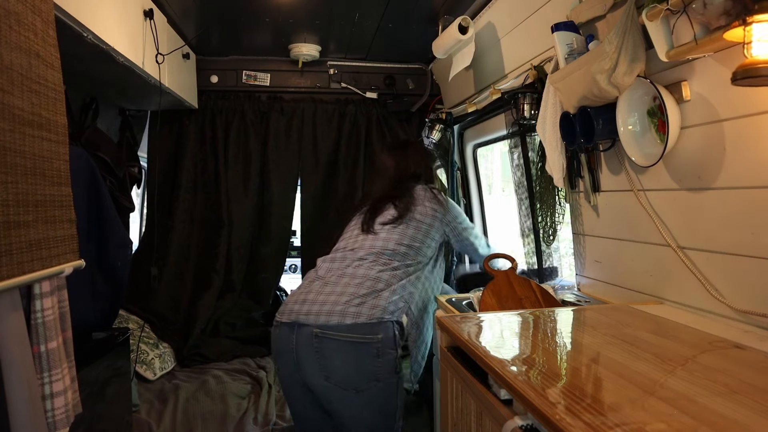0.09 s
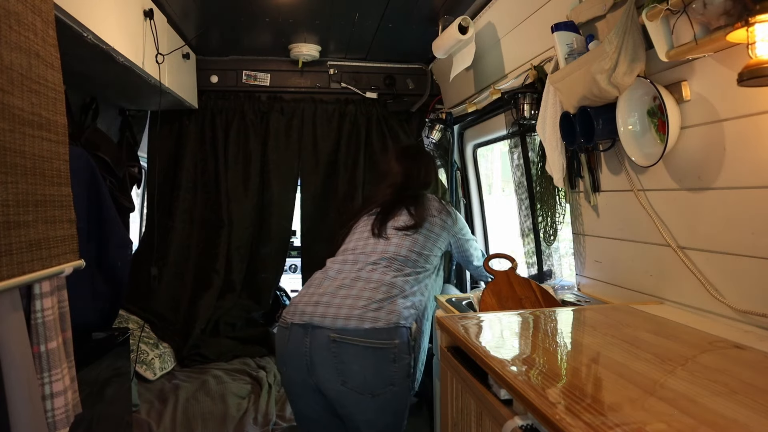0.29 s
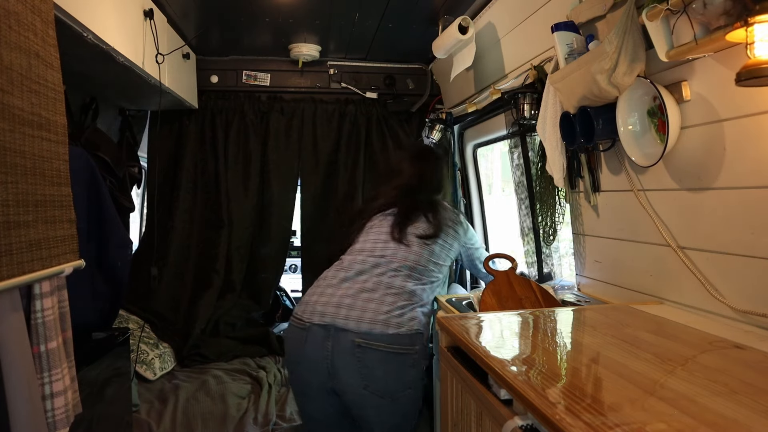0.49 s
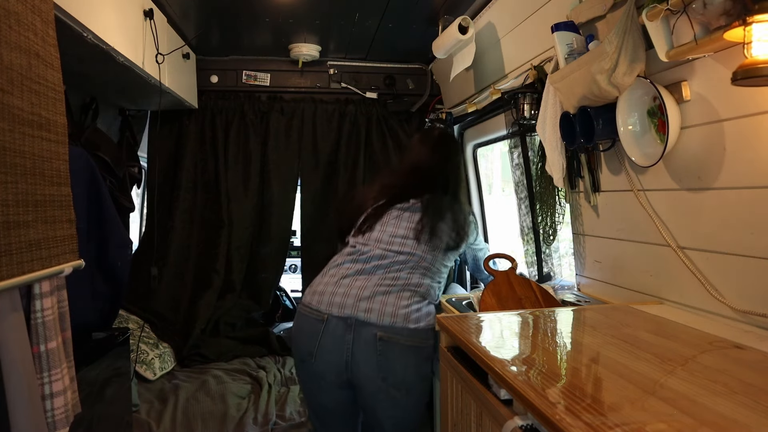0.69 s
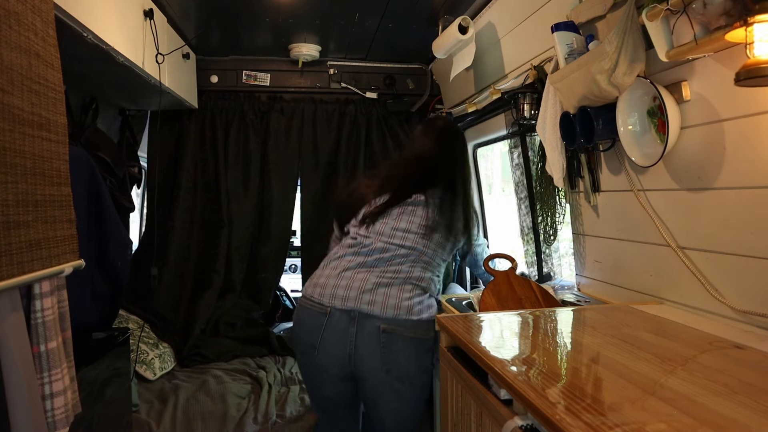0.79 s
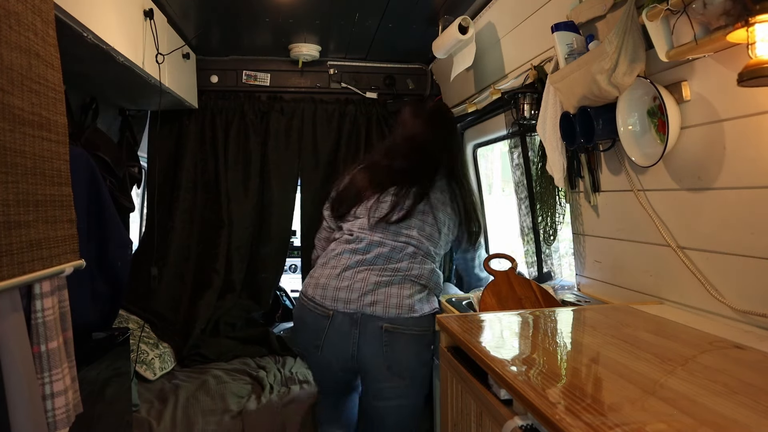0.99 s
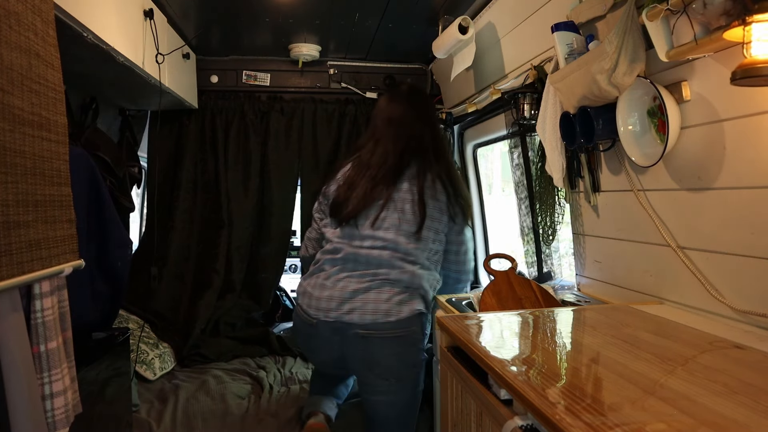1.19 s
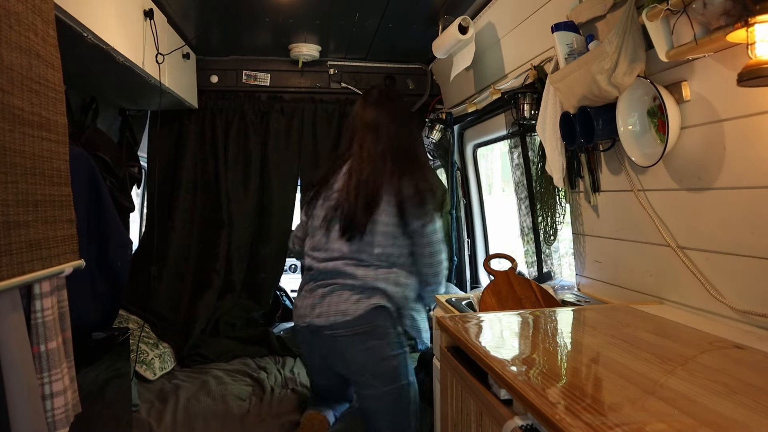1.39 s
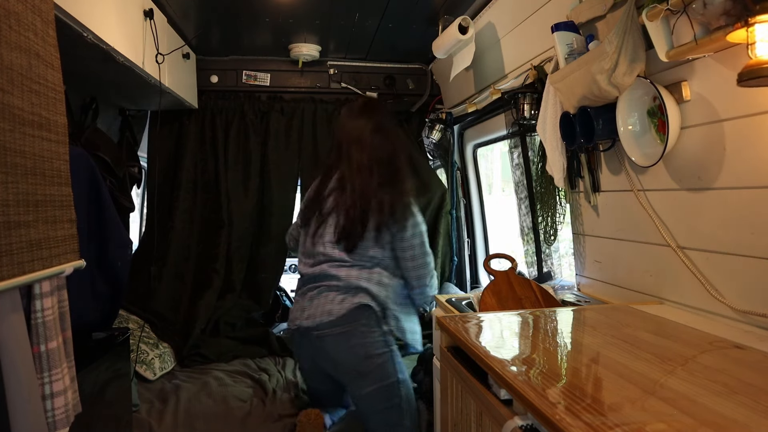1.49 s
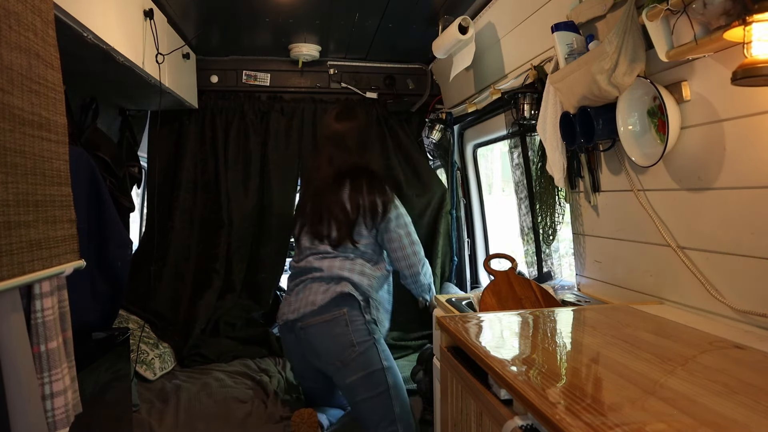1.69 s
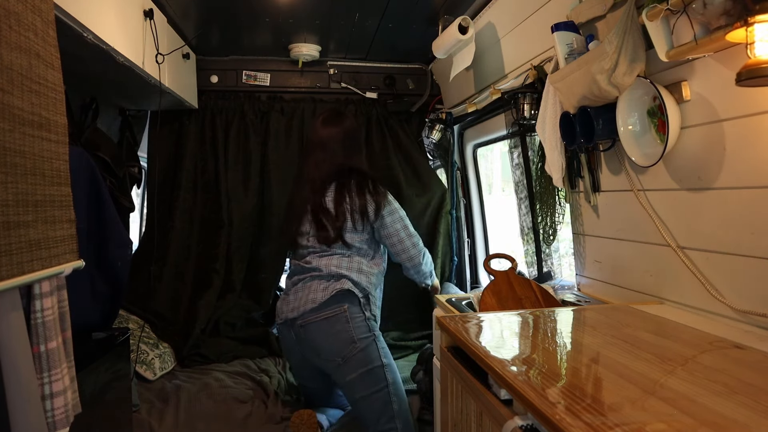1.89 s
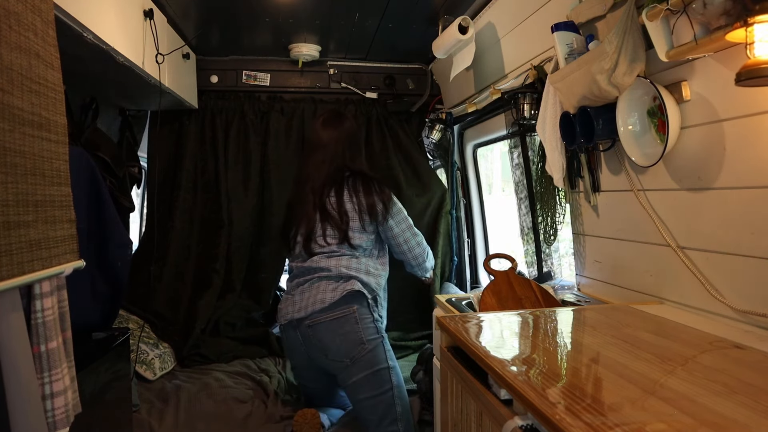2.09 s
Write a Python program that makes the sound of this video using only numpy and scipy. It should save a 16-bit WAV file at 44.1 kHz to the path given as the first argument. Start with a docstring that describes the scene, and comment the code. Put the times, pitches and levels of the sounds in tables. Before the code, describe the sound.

Heavy cloth rustles with one sharp wooden knock and soft thumps over a low rumble.

```python
"""Inside a parked van, close on a two-port microphone. Heavy cloth drags over a low rumble.
At 0.2 s a hard object knocks sharply on wood and bounces. Soft thumps and small snaps of the weave
come with the handling, joined by light taps from 0.8 s. The drag is loudest just after 1.5 s;
a short scrape on a panel follows at 1.8 s, and the rumble swells at the end.
The padded cabin rings briefly after each hit."""
import sys
import numpy as np
from scipy import signal
from scipy.fft import rfft, irfft
from scipy.io import wavfile
from scipy.ndimage import uniform_filter1d

SR = 44100
rng = np.random.default_rng(int(sys.argv[2]) if len(sys.argv) > 2 else 0)


def store_pcm(level_fs):
    """Save levels as 16-bit WAV."""
    pcm = np.round(np.clip(level_fs, -1, 1) * 32767).astype(np.int16)
    wavfile.write(sys.argv[1], SR, np.atleast_2d(pcm).T)


N = 92610  # 2.1 s

# Spectrum of the weave's hiss and snaps. Each row: frequency in Hz, relative level in dB.
WEAVE_SPECTRUM = [(1500, -20.5), (2900, .5), (5000, -7), (6300, -12.5), (9600, -18.5), (11700, -31),
                  (15500, -39)]


def amp(db):
    return 10 ** (np.asarray(db) / 20)


def unit_rms(x):
    return x / np.sqrt(np.mean(x ** 2) + 1e-20)


def at_hz(points, hz):
    """Reads a table along a logarithmic frequency axis."""
    point_hz, value = np.transpose(points)
    return np.interp(np.log(hz + 1), np.log(point_hz + 1), value)


def over_time(table, column=1):
    """One column of a timed table, interpolated to every sample."""
    rows = np.array(table)
    return np.interp(np.arange(N) / SR, rows[:, 0], rows[:, column])


def add(mix, start_s, sound):
    part = mix[round(start_s * SR):][:len(sound)]
    part += sound[:len(part)]


def colour(x, spectrum):
    """Filters to a spectrum, at an rms of 1."""
    gain = amp(at_hz(spectrum, np.fft.rfftfreq(len(x), 1 / SR)))
    return unit_rms(irfft(rfft(x) * gain, len(x)))


def resonate(x, hz, q, passes):
    """Repeated passes through one resonance, at an rms of 1."""
    for _ in range(passes):
        x = signal.lfilter(*signal.iirpeak(hz, q, SR), x)
    return unit_rms(x)


def cloth():
    """One rubbing sounds as a midrange drag, the dull body of the cloth's mass and a fine hiss."""
    # Spectra of the drag and the body. Each row: frequency in Hz, relative level in dB.
    drag_spectrum = [(400, -95), (800, -4), (1300, -0.5), (1800, 2.5), (2400, -0.5), (3000, -15.5),
                     (5000, -45)]
    body_spectrum = [(60, -6), (110, -2.5), (300, 4.5), (750, 1), (1500, -15), (3000, -68)]
    # Their swells. Each row: time in seconds, level in dB.
    drag_levels = [(0, -50.5), (.2, -47), (.3, -45), (.34, -52.5), (.4, -52), (.47, -48), (.74, -48.5),
                   (.99, -44.5), (1.14, -51.5), (1.27, -60), (1.42, -48), (1.5, -49), (1.54, -38),
                   (1.6, -39), (1.67, -45), (1.71, -51.5), (1.86, -49), (1.92, -45), (1.98, -62.5),
                   (2.1, -51)]
    body_levels = [(0, -54), (.21, -47), (.29, -31.5), (.36, -48), (.45, -43.5), (.62, -53.5), (.8, -44),
                   (.86, -52), (1.1, -50), (1.28, -54), (1.5, -48), (1.56, -42.5), (1.67, -38.5),
                   (1.72, -51), (1.86, -43), (1.9, -36.5), (1.97, -50), (2.1, -50.5)]
    # Course of the hiss. Each row: time in seconds, level in dB before tilt, tilt in dB per octave.
    hiss_course = [(0, -47, 1.5), (.19, -53.5, 2.5), (.31, -45, -1), (.35, -58.5, 2), (.48, -49, 0),
                   (.56, -56, 3), (.61, -48, 3), (.68, -56.5, -0.5), (.88, -52.5, 4), (.98, -47, 5),
                   (1.12, -59, 4), (1.33, -61.5, 1), (1.45, -55, 1), (1.51, -50, -1), (1.67, -51, -3.5),
                   (1.72, -59.5, -2), (1.86, -56.5, -1), (1.9, -51.5, -3), (1.98, -64.5, 3),
                   (2.1, -61.5, 0.5)]
    rub = fibres()
    drag = amp(over_time(drag_levels)) * colour(rub, drag_spectrum)
    body = amp(over_time(body_levels)) * colour(rub, body_spectrum)
    hz, t, bands = signal.stft(colour(rub, WEAVE_SPECTRUM), SR, nperseg=256)
    frame_samples = np.minimum(t * SR, N - 1).astype(int)
    tilt = over_time(hiss_course, column=2)[frame_samples]
    octaves = np.log2(np.maximum(hz, 1000) / 4000)[:, None]
    hiss = signal.istft(bands * amp(tilt * octaves), nperseg=256)[1][:N]
    return drag + body + amp(over_time(hiss_course)) * hiss


def fibres():
    """Rubbing fibres: patchy, flickering noise mixed with tiny catches of uneven size."""
    patch_db, flicker_db, catches_per_s, catch_share = 2.6, 2.5, 2500, .4
    _, t, bands = signal.stft(rng.standard_normal(N), nperseg=256)
    patches = uniform_filter1d(rng.standard_normal(bands.shape), size=4, axis=0)
    patches = unit_rms(uniform_filter1d(patches, size=10, axis=1))
    flicker = unit_rms(uniform_filter1d(rng.standard_normal(len(t)), size=3))
    sliding = signal.istft(bands * amp(patch_db * patches + flicker_db * flicker), nperseg=256)[1][:N]
    size, chance, polarity = rng.random((3, N))
    catch_db = np.minimum(-np.log(size + 1e-9), 5)
    catches = amp(catch_db) * (chance < catches_per_s / SR) * np.sign(polarity - .5)
    return np.sqrt(1 - catch_share) * unit_rms(sliding) + np.sqrt(catch_share) * unit_rms(catches)


def knock():
    """Each contact rings the modes of the wood; soft ones miss the high modes and hardly crack."""
    # The knock and its bounces. Each row: start in seconds, strength in dB, treble cutoff in Hz.
    contacts = [(0.213, 3.5, 9000), (.2240, -5.5, 9000), (0.263, -8, 650), (.277, -5, 650),
                (0.299, -10, 684), (0.311, -10, 500), (0.4154, -7.5, 760)]
    # Modes of the wood. Each row: frequency in Hz, relative level in dB, t60 in seconds.
    wood_modes = [(328, -18, .11), (437, -18, .08), (785, -5, .06), (888, -4, .03), (983, -5, .03),
                  (1125, -5, .055), (1490, -14, .03), (1766, -10, .04), (2068, -4, .03), (2330, -6, .04),
                  (2720, -11, .03)]
    # Spectrum of the contact's crack. Each row: frequency in Hz, relative level in dB.
    crack_spectrum = [(350, -5), (900, 9), (2200, -4.5), (3200, -13.5), (5500, -22), (15000, -72)]
    rise_s, crack_t60_s = .00015, .036
    out, t = np.zeros(N), np.arange(SR // 4) / SR
    for start_s, db, cutoff_hz in contacts:
        wood = np.zeros(len(t))
        for k, (hz, mode_db, t60) in enumerate(wood_modes):
            excitation = (-1) ** k / (1 + (hz / cutoff_hz) ** 4)
            wood += excitation * amp(mode_db - 60 * t / t60) * np.sin(2 * np.pi * hz * t)
        wood *= amp(-8) * np.minimum(t / rise_s, 1)
        crack = amp(-6 - 60 * t / crack_t60_s) * colour(rng.standard_normal(len(t)), crack_spectrum)
        hardness = 1 / (1 + (2000 / cutoff_hz) ** 4)
        add(out, start_s, amp(db) * (wood + hardness * crack))
    return out


def blows(events, rise_s, q, wide_db, ring_gain):
    """Each blow is a clean ring plus a dying shudder through a narrow and a wider resonance."""
    out, t = np.zeros(N), np.arange(SR // 5) / SR
    for start_s, db, hz, t60 in events:
        envelope = amp(-60 * t / t60) * np.minimum(t / rise_s, 1)
        shudder = envelope * rng.standard_normal(len(t))
        narrow = resonate(shudder, hz, q, passes=2)
        wide = resonate(shudder, hz * 1.4, q=.8, passes=3)
        ring = unit_rms(envelope * np.sin(2 * np.pi * hz * t))
        blow = unit_rms(narrow + amp(wide_db) * wide + ring_gain * ring)
        add(out, start_s, amp(db) * blow * np.sqrt(np.mean(envelope ** 2)))
    return out


def thumps():
    """Cloth and limbs land softly on the panels, which ring low."""
    # The landings. Each row: start in seconds, level in dB, pitch in Hz, t60 in seconds.
    landings = [(.263, -26.5, 128, 0.052), (.38, -31, 199.7, 0.25), (.416, -19.5, 168, 0.089),
                (.421, -26.5, 245, 0.13), (.455, -26.5, 97, 0.082), (.547, -25, 144, 0.056),
                (.795, -27.5, 268, 0.069), (1.014, -32.5, 181, 0.097), (1.076, -30.5, 288, 0.073),
                (1.163, -34, 251, 0.066), (1.529, -25, 196, 0.1), (1.632, -27, 87.5, 0.046),
                (1.887, -26.5, 123, 0.069), (2.02, -38, 258, 0.11), (2.078, -30.5, 183, 0.061)]
    return blows(landings, rise_s=.0032, q=1.5, wide_db=-4, ring_gain=1.1)


def taps():
    """Light contacts in the handling start fast and ring high."""
    # The contacts. Each row: start in seconds, level in dB, pitch in Hz, t60 in seconds.
    contacts = [(.814, -34.5, 1817, 0.05), (1.0585, -34.5, 2124, 0.04), (1.395, -27.5, 1865, 0.019),
                (1.475, -43, 1093, 0.33), (1.6803, -32, 1535, 0.047), (1.889, -26, 740, 0.026),
                (1.9345, -41.5, 1930, 0.047), (1.952, -37.5, 880, 0.037)]
    return blows(contacts, rise_s=.0006, q=1.37, wide_db=-17, ring_gain=.92)


def snaps():
    """The weave snaps in short bursts of noise, each with its own brightness."""
    # The bursts. Each row: start in seconds, relative level in dB, tilt in dB per octave.
    bursts = [(0.3666, -35, 11.5), (0.7173, -34, 2), (0.818, -27.5, -4.5), (0.863, -34, 10),
              (1.0588, -32.5, 8), (1.075, -34.5, 17), (1.1689, -33.5, 4.5), (1.3944, -44, 13),
              (1.5017, -32, 5), (1.568, -44, 6), (1.647, -38, 2), (1.8166, -35, 0), (1.8866, -33.5, -3),
              (1.9355, -33, -1.5)]
    t60_s = .033
    out, t = np.zeros(N), np.arange(SR // 10) / SR
    for start_s, db, tilt in bursts:
        spectrum = [(hz, band_db + tilt * np.log2(hz / 4000)) for hz, band_db in WEAVE_SPECTRUM]
        noise = colour(rng.standard_normal(len(t)), spectrum)
        add(out, start_s, amp(db - 60 * t / t60_s) * noise / 2)
    return out


def scrape():
    """Four quick slips of something rubbing on a panel, each ringing the same note."""
    start_s, gap_s, db, hz, t60_s = 1.8305, .0077, -26, 600, .045
    slips = [(start_s + k * gap_s, db, hz, t60_s) for k in range(4)]
    return blows(slips, rise_s=.003, q=3, wide_db=-16, ring_gain=1.6)


def rumble():
    """Low noise of the van's shell, swelling as weight shifts."""
    # Spectrum of the shell. Each row: frequency in Hz, relative level in dB.
    shell_spectrum = [(15, -9), (42, -8), (57, 4), (78, -6.5), (120, -12.5), (200, -32.5), (400, -85)]
    # Its swells. Each row: time in seconds, level in dB.
    shell_levels = [(0, -49), (.26, -44), (.46, -42.5), (.65, -45.5), (.8, -42.5), (1.47, -46),
                    (1.65, -46.5), (1.8, -44), (2.1, -39.5)]
    return amp(over_time(shell_levels)) * colour(rng.standard_normal(N), shell_spectrum)


def cabin(x):
    """Dense reflections in the padded cabin arrive after 3 ms; the treble dies first."""
    # Decay of the cabin. Each row: frequency in Hz, t60 in seconds.
    decay_times = [(200, 0.44), (1500, .15), (8000, 0.057)]
    hz, t, bands = signal.stft(rng.standard_normal(SR // 2), SR, nperseg=256)
    decay = amp(-60 * t / at_hz(decay_times, hz)[:, None])
    tail = signal.istft(bands * decay, SR, nperseg=256)[1]
    tail *= np.arange(len(tail)) > .003 * SR
    return signal.fftconvolve(x, tail / np.linalg.norm(tail))[:N]


def scattered(x, t60_s=.0069):
    """Scattering around the microphone smears a sound by a few milliseconds."""
    t = np.arange(800) / SR
    response = rfft(rng.standard_normal(len(t)) * amp(-60 * t / t60_s), N)
    power = abs(response) ** 2
    return irfft(rfft(x) * response / np.sqrt(power + np.mean(power) / 10), N)


def port_pair(common, differing):
    """Mid and side signals become two ports, most alike in the bass and near 2.4 kHz."""
    # Likeness of the ports. Each row: frequency in Hz, likeness from 0 to 1.
    port_likeness = [(60, 1), (300, 0.89), (1400, 0.81), (2400, 1), (3500, 0.052), (6000, 0.39),
                     (15000, 0.55)]
    likeness = at_hz(port_likeness, np.fft.rfftfreq(N, 1 / SR))
    mid = rfft(common) * np.sqrt((1 + likeness) / 2)
    side = rfft(differing) * np.sqrt((1 - likeness) / 2)
    return irfft([mid + side, mid - side], N)


def scene():
    """The hits with their cabin ring, the cloth and the rumble reach the two ports."""
    hits = knock() + thumps() + taps() + snaps() + scrape()
    hits += amp(-14.5) * cabin(hits)
    common = hits + cloth() + rumble()
    differing = scattered(hits) / 2 + cloth() + rumble()
    return port_pair(common, differing)


def record(dry):
    """The microphone: the left port lags in phase, overload clips, and the band ends at 15.8 kHz."""
    # Response of the left port. Each row: frequency in Hz, gain in dB.
    left_response = [(6000, 0.38), (12000, -1.5)]
    # Lag of the left port behind the right. Each row: frequency in Hz, phase in radians.
    left_lag = [(1400, 0.2), (2400, 0.85), (3500, 1.56), (5000, 2.3), (15000, 3.05)]
    hz = np.fft.rfftfreq(N, 1 / SR)
    half_lag = np.exp(-.5j * at_hz(left_lag, hz))
    left_gain = amp(at_hz(left_response, hz))
    ports = irfft(rfft(dry) * [left_gain * half_lag, 1 / half_lag], N)
    lowpass = signal.firwin(511, 15800, window=("kaiser", 9), fs=SR)
    return signal.oaconvolve(np.clip(ports, -1, 1), lowpass[None], "same")


dry = scene()
out = record(dry)
store_pcm(out)
```